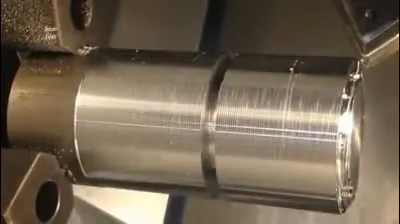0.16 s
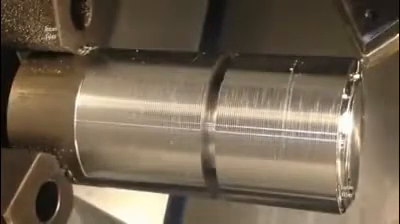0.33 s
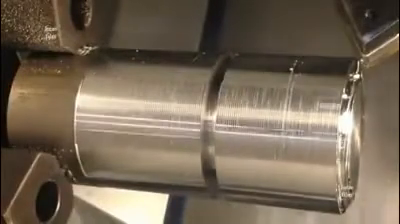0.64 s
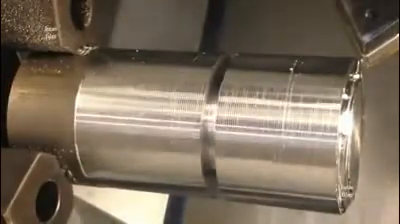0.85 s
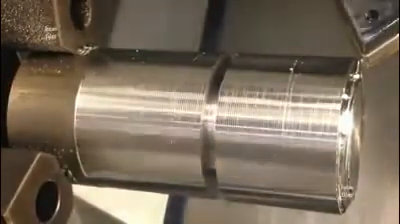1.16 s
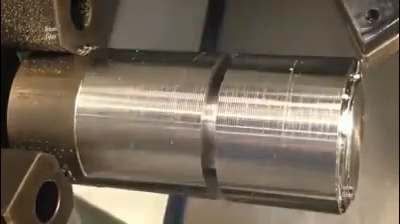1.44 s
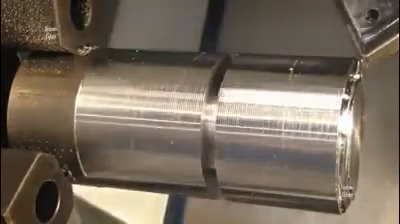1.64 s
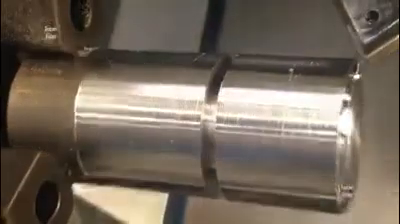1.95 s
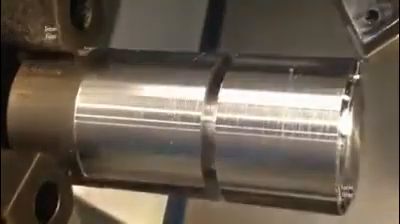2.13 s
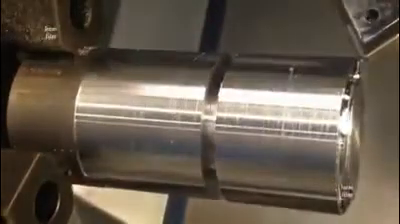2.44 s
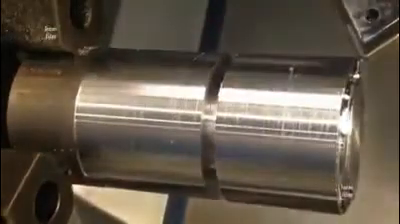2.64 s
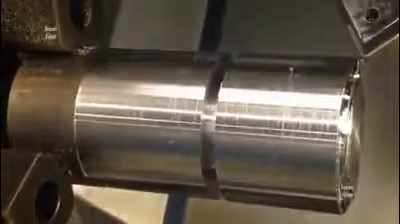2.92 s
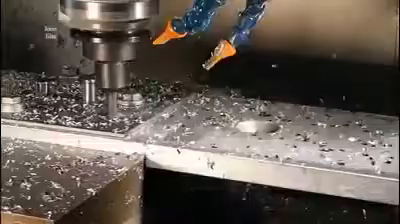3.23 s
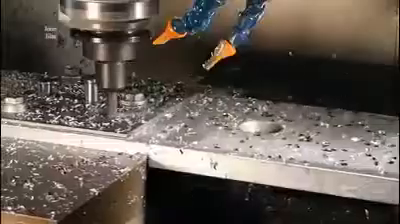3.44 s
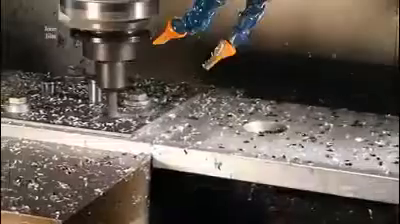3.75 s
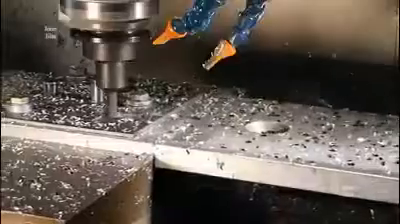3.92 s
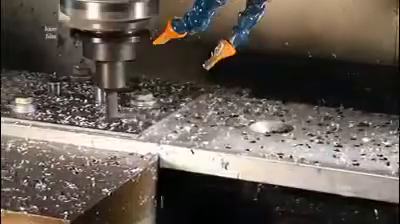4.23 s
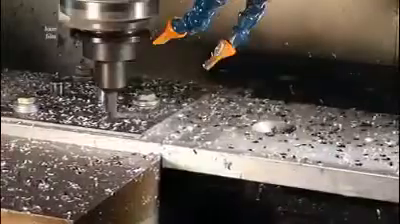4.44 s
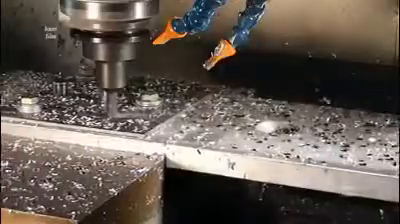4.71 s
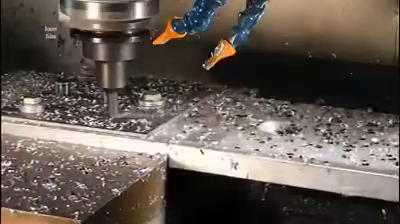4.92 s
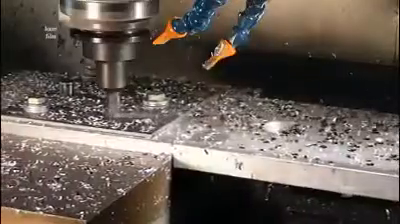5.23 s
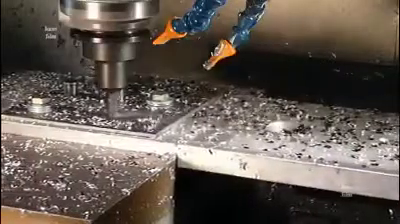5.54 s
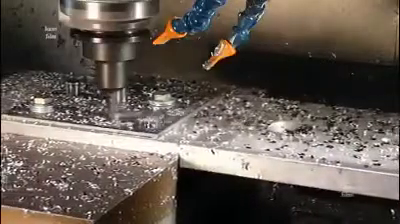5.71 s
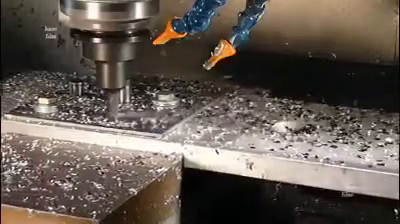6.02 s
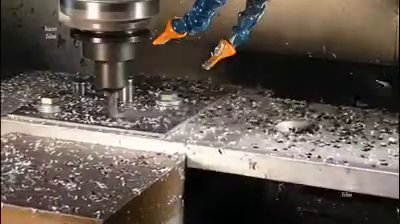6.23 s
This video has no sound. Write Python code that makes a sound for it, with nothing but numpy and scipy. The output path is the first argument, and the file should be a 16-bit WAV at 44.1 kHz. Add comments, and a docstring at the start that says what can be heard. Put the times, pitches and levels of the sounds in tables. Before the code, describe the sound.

A metal lathe puffs air, knocks and spins up, then a milling cutter drones and whines steadily as it tears chips from a plate.

```python
"""A lathe spins a steel bar inside its cabinet: air valves puff, the turret knocks, the spindle
roars up and settles, a latch snaps and the last blow sets the cabinet rocking.
Then, all at once, a milling machine: its cutter bites a plate on every turn, drones on multiples
of that rate, whines in long swells, squeals thinly and tears off a stream of chips."""
import sys
import numpy as np
from scipy import signal
from scipy.fft import rfft, irfft, next_fast_len
from scipy.io import wavfile

SR = 44100
rng = np.random.default_rng(int(sys.argv[2]) if len(sys.argv) > 2 else 0)


def wav_record(signal):
    """Record a signal, one row per channel, as 16-bit PCM in the file named by sys.argv[1]."""
    frames = np.transpose(np.atleast_2d(signal))
    bounded = np.clip(frames, -1, 1)
    # unit amplitude maps onto the largest positive 16-bit level
    quanta = np.round(bounded * 32767).astype(np.int16)
    wavfile.write(sys.argv[1], SR, quanta)


N = 280917
TIME_S = np.arange(N) / SR


def from_db(db):
    return 10 ** (np.asarray(db) / 20)


def unit_rms(x):
    return x / np.sqrt(np.mean(x ** 2) + 1e-20)


def colour(x, spectrum, skirt_db_per_octave=90):
    """Filter by (Hz, dB) rows, falling steeply past their ends; rms 1."""
    hz, db = np.transpose(spectrum)
    size = next_fast_len(N)
    octave, known = np.log2(np.arange(size // 2 + 1) * SR / size + 1), np.log2(hz)
    beyond = np.abs(octave - np.clip(octave, known[0], known[-1]))
    gain = from_db(np.interp(octave, known, db) - skirt_db_per_octave * beyond)
    return unit_rms(irfft(rfft(x, size) * gain, size)[:N])


def noise(spectrum):
    return colour(rng.standard_normal(N), spectrum)


def drift(rate_hz, hop=40):
    """Smooth random wander; rms about 1."""
    pole = np.exp(-2 * np.pi * rate_hz * hop / SR)
    white = rng.standard_normal(N // hop + 2002)
    slow = signal.lfilter([1], [1, -2 * pole, pole * pole], white)[2000:]
    return np.interp(np.arange(N) / hop, np.arange(len(slow)), unit_rms(slow))


def tone(hz, waver, rate_hz):
    """Steady or gliding sine, wavering in level and phase; rms 1."""
    turns = np.cumsum(hz * np.ones(N)) / SR + rng.random()
    level = 1 + waver * drift(rate_hz)
    return unit_rms(level * np.sin(2 * np.pi * turns + waver * drift(rate_hz)))


def burst(start_s, rise_s, hold_s, t60_s):
    """Envelope: linear rise, decay from hold_s after the start."""
    age_s = TIME_S - start_s
    return np.clip(age_s / rise_s, 0, 1) * from_db(-60 * np.clip((age_s - hold_s) / t60_s, 0, 2))


def swell(start_s, length_s, fade_s):
    """Trapezoid envelope."""
    age_s = TIME_S - start_s
    return np.clip(np.minimum(age_s, length_s - age_s) / fade_s, 0, 1)


def enclosure(x, t60_s, wet_db):
    """Dense reflections between sheet-metal walls; loudness is kept."""
    age_s = np.arange(SR // 4) / SR
    echoes = rng.standard_normal(len(age_s)) * from_db(-60 * age_s / t60_s)
    wet = signal.fftconvolve(x, echoes / np.linalg.norm(echoes))[:N]
    return (x + from_db(wet_db) * wet) / np.hypot(1, from_db(wet_db))


# Spindle noise spectra. Each row: frequency in Hz, relative density in dB.
RUMBLE_SPECTRUM = [(22, -24), (32, -14), (45, 0.5), (62, -1.5), (78, 9), (92, -3.5), (110, -3), (135, -6),
                   (175, -6.5)]
WHIRR_SPECTRUM = [(90, -26.5), (140, -4.5), (200, -4), (290, 1), (350, -4.5), (420, -4.5), (520, -4.5),
                  (640, -9.5), (850, -8.5), (1000, -11.5), (1440, -15), (2280, -16.5), (3300, -21.5),
                  (4100, -33.5)]
HISS_SPECTRUM = [(3000, -18.5), (3800, 4.5), (5000, 0), (7000, -3.5), (8800, -12.5)]


def spindle(surge_s=0.34, rise_s=0.26, hold_s=0.2, ease_s=0.41, settle_db_per_s=4.5):
    """Chuck rumble, bearing whirr and hiss swell as the drive works the chuck up to speed."""
    effort = np.interp(TIME_S, surge_s + np.cumsum([0, rise_s, hold_s, ease_s]), [0, 1, 1, 0])
    rumble = from_db(-33 + 6.5 * effort - settle_db_per_s * TIME_S) * noise(RUMBLE_SPECTRUM)
    whirr = from_db(-36 + 7 * effort + drift(17)) * noise(WHIRR_SPECTRUM)
    hiss = from_db(-57.5 + 4 * effort) * noise(HISS_SPECTRUM)
    return rumble + enclosure(whirr + hiss, t60_s=0.17, wet_db=-4.5)


# Spindle run-up. Each row: time in seconds, share of full speed.
RUN_UP = [(0.419, 0.053), (.6, 0.62), (0.759, 0.98), (1.1, 0.97)]
# Drive tones and electric hum at full speed. Each row: frequency in Hz, level in dB.
DRIVE_TONES = [(226, -52.5), (269, -43.5), (382, -56.5), (552, -45.5)]
HUM_TONES = [(59.2, -49.5), (720.5, -52.5), (765, -44.5), (4190, -69)]


def drive():
    """The drive's tones climb with speed; they and its fixed-pitch hum grow louder."""
    speed = np.interp(TIME_S, *np.transpose(RUN_UP))
    turning = sum(from_db(db) * tone(hz * speed, waver=0.59, rate_hz=11) for hz, db in DRIVE_TONES)
    hum = sum(from_db(db) * tone(hz, waver=0.15, rate_hz=3) for hz, db in HUM_TONES)
    return speed * (turning + hum)


# Valve puffs. Each row: start in seconds, level in dB, rise, hold and t60 in seconds, jet peak in Hz.
VALVE_PUFFS = [(0.046, -34.5, 0.015, .025, 0.18, 900), (0.0897, -25, 0.00092, 0.046, 0.27, 6320),
               (0.317, -31.5, 0.018, 0.024, 0.29, 4500), (1.655, -36, 0.036, 0.26, 0.29, 7030),
               (1.857, -25, 0.0015, 0.015, 0.15, 4370)]
# Venting air. Each row: frequency in Hz, relative density in dB.
AIR_SPECTRUM = [(500, 9.5), (1000, 7.5), (1550, -4.5), (2200, 1), (2750, -10.5), (3500, -3), (4900, -8),
                (6900, -11), (8700, -18)]


def valves(pop_db=4.5, pop_s=0.006, flutter_db=2.0):
    """Jets of compressed air, each with its opening's broad peak; a fast valve starts with a crack."""
    jets = np.zeros(N)
    for start_s, db, rise_s, hold_s, t60_s, peak_hz in VALVE_PUFFS:
        air = noise(AIR_SPECTRUM)
        peak = signal.lfilter(*signal.iirpeak(peak_hz, Q=1.4, fs=SR), air)
        crack_db = pop_db * np.exp(-np.abs(TIME_S - start_s) / pop_s)
        jets += from_db(db + crack_db) * burst(start_s, rise_s, hold_s, t60_s) * unit_rms(air + peak)
    return jets * from_db(flutter_db * drift(60))


def contact_time_s(pitch_hz, cycles=2.5, longest_s=0.0089):
    """Duller blows are softer and stay in contact longer."""
    return min(cycles / pitch_hz, longest_s)


# Turret and cabinet modes. Each row: frequency in Hz, relative level in dB, t60 in seconds.
STEEL_MODES = [(71.8, -0.5, 0.26), (112.8, -4, 0.44), (151, 2.5, 0.2), (166, -12.5, 0.26), (202.7, 1, 0.25),
               (362, -12, 0.41), (423.2, -2, 0.11), (1034, -2, 0.14), (1125, -2.5, 0.1),
               (1308, -4.5, 0.084), (1410, -3, .1)]


def steel_ring(start_s, ring_db, pitch_hz, reach_octaves=0.21):
    """One contact rings the modes near its pitch."""
    ring = np.zeros(N)
    at, age_s = round(start_s * SR), np.arange(SR) / SR
    attack = np.minimum(age_s / contact_time_s(pitch_hz), 1)
    for hz, db, t60_s in STEEL_MODES:
        nearness = np.exp(-(np.log2(hz / pitch_hz) / reach_octaves) ** 2 / 2)
        envelope = attack * from_db(ring_db + db - 60 * age_s / t60_s)
        ring[at:at + SR] += nearness * envelope * np.sin(2 * np.pi * hz * age_s)
    return ring


# Turret blows. Each row: start in seconds, ring in dB, favoured pitch in Hz, clatter in dB,
# second contact relative to the first in dB.
TURRET_BLOWS = [(0.072, -2.5, 442, -27, -6.5), (.328, -18, 179, -40, -16), (1.701, -29, 1094, -27.5, -17),
                (1.732, -26.5, 210.6, -50, -8), (1.841, -17.5, 214, -26.5, 4),
                (1.858, -15.5, 1280, -21, -6)]
# Loose steel. Each row: frequency in Hz, relative density in dB.
CLATTER_SPECTRUM = [(60, -7), (250, 5.5), (600, -2.5), (1100, 2), (1900, -6.5), (3200, -4.5), (5000, -19),
                    (7000, -15.5), (8800, -37.5)]


def turret(second_contact_s=0.0355, clatter_t60_s=0.22, rattle_db=2):
    """Every blow lands twice, ringing the modes and shaking loose steel."""
    ringing, clatter_power = np.zeros(N), np.zeros(N)
    for start_s, ring_db, pitch_hz, clatter_db, second_db in TURRET_BLOWS:
        contact_s = contact_time_s(pitch_hz)
        for at_s, db in [(start_s, 0), (start_s + second_contact_s, second_db)]:
            ringing += steel_ring(at_s, ring_db + db, pitch_hz)
            shake = from_db(clatter_db + db) * burst(at_s, contact_s, contact_s, clatter_t60_s)
            clatter_power += shake ** 2
    rattle = from_db(rattle_db * drift(120))   # loose parts touch unevenly
    return ringing + np.sqrt(clatter_power) * noise(CLATTER_SPECTRUM) * rattle


# Latch snap. Each row: start in seconds, level in dB, frequency in Hz, t60 in seconds.
LATCH_SNAPS = [(1.7035, -12, 1000, .014)]


def latch(rise_s=0.001, hold_s=0.0003):
    """The latch goes in with one dry, heavily damped snap."""
    snap = np.zeros(N)
    for start_s, db, hz, t60_s in LATCH_SNAPS:
        envelope = from_db(db) * burst(start_s, rise_s, hold_s, t60_s)
        snap += envelope * np.sin(2 * np.pi * hz * (TIME_S - start_s))
    return snap


def shudder(level_db=-27):
    """Deep rumble as the turret seats."""
    envelope = burst(start_s=1.78, rise_s=0.06, hold_s=0.2, t60_s=0.23)
    return from_db(level_db) * envelope * noise(RUMBLE_SPECTRUM)


# Parts struck by each thump. Each row: favoured pitch in Hz, first ring in dB.
CABINET_PARTS = [(78, -13.5), (118, -15.5), (345, -14.5)]


def cabinet_rock(start_s=1.862, period_s=0.083, loss_db=3.0, thumps=3):
    """The cabinet rocks after the last blow: ever weaker thumps in the frame, a panel ringing along."""
    return sum(steel_ring(start_s + k * period_s, db - k * loss_db, hz)
               for k in range(thumps) for hz, db in CABINET_PARTS)


CUTTER_HZ = 67.935
# Cutting force. Each row: multiple of the turning rate, relative level in dB.
CUTTER_HARMONICS = [(1, -21), (2, -20), (3, -8), (4, -7), (5, -7.5), (6, -27), (7, 1), (8, -8.5), (9, -8.5),
                    (10, -12.5), (11, -17.5), (14, -27.5), (15, -17), (17, -25.5), (20, -20), (23, -20.5),
                    (24, -31)]


def cutter_drone(load_db, level_db=-29, load_share=0.68, wander_db=0.5):
    """The periodic cutting force drones; its level follows the load and also wanders."""
    drone = sum(from_db(db) * tone(k * CUTTER_HZ, waver=0.07, rate_hz=6) for k, db in CUTTER_HARMONICS)
    return from_db(level_db + load_share * load_db + wander_db * drift(4.8)) * drone


# Swells of the whine. Each row: start in seconds, length in seconds, level in dB.
WHINE_SPELLS = [(2.8, 0.97, -36.5), (3.896, 0.96, -34), (5.053, 1.26, -35)]


def cutter_whine(hz=816, fade_s=0.26):
    """The cut whines on one pitch in long swells."""
    envelope = sum(from_db(db) * swell(at_s, length_s, fade_s) for at_s, length_s, db in WHINE_SPELLS)
    return envelope * tone(hz, waver=0.05, rate_hz=4)


# Tool squeal. Each row: frequency in Hz, relative level in dB.
SQUEAL_TONES = [(2597, -17.5), (2649, -20), (2686, -9.5), (2717.4, -7.5), (2747, -12.5), (2783, -13),
                (2809, -18), (2837, -21.5), (2853, -11), (2989, -13), (3207, -25.5), (3262, -23.5),
                (3921, -20), (3989, -28.5), (4262, -31.5)]


def tool_squeal(load_db, level_db=-37.5, load_share=0.75):
    """The tool squeals in a thin cluster of wavering tones that follows the load."""
    squeal = sum(from_db(db) * tone(hz, waver=0.42, rate_hz=9.7) for hz, db in SQUEAL_TONES)
    return from_db(level_db + load_share * load_db) * squeal


def fractures(bite_db, flute_db=0.35, grain_db=0.5):
    """Tiny uneven fractures surge twice a turn; bite_db makes one flute bite deeper."""
    angle = 2 * np.pi * CUTTER_HZ * TIME_S
    surge_db = bite_db * np.cos(angle) + flute_db * np.cos(2 * angle)
    return rng.standard_normal(N) * from_db(surge_db + grain_db * drift(300))


# Tearing chips, body and top. Each row: frequency in Hz, relative density in dB.
CHIP_BODY_SPECTRUM = [(30, -39.5), (55, -14.5), (110, -11), (160, -7.5), (205, 1.5), (250, -2.5),
                      (370, -3.5), (450, 2), (590, -2.5), (700, -4.5), (880, -3), (1050, -7), (1700, -10.5),
                      (2000, -8.5)]
CHIP_TOP_SPECTRUM = [(1900, -26), (2100, -3.5), (2400, -2.5), (2780, -2.5), (3100, -4.5), (3450, -8.5),
                     (3700, -9.5), (3830, -25), (4100, -22), (4800, -31.5), (5300, -50.5)]


def chips(load_db, body_db=-29, top_db=-38.5):
    """Chips tear off, coloured by plate and housing; the level follows the load."""
    body = from_db(body_db) * colour(fractures(bite_db=1.0), CHIP_BODY_SPECTRUM)
    top = from_db(top_db) * colour(fractures(bite_db=0.0), CHIP_TOP_SPECTRUM)
    return from_db(load_db) * enclosure(body + top, t60_s=0.2, wet_db=-9.5)


# Slack spells in the cut. Each row: start in seconds, length in seconds, load change in dB.
LOAD_DIPS = [(4.263, 0.54, -2.5), (5.06, .25, -3), (5.68, 1.0, -2)]


def mill(fade_s=0.14):
    """A steady cut that slackens a few times."""
    load_db = sum(db * swell(start_s, length_s, fade_s) for start_s, length_s, db in LOAD_DIPS)
    return cutter_drone(load_db) + cutter_whine() + tool_squeal(load_db) + chips(load_db)


def scene(change_s=2.982, crossfade_s=0.011):
    """The lathe, then the mill; mono."""
    lathe = spindle() + drive() + valves() + turret() + latch() + shudder() + cabinet_rock()
    milling = np.clip((TIME_S - change_s) / crossfade_s + 0.5, 0, 1)
    return ((1 - milling) * lathe + milling * mill())[None]


def record(dry, cutoff_hz=8700):
    """Steep low-pass."""
    return signal.sosfilt(signal.ellip(12, 0.2, 80, cutoff_hz, fs=SR, output="sos"), dry)


dry = scene()
out = record(dry)
wav_record(out)
```